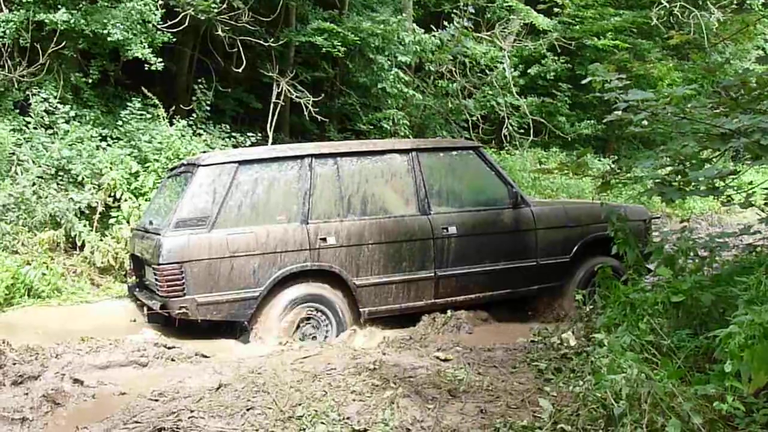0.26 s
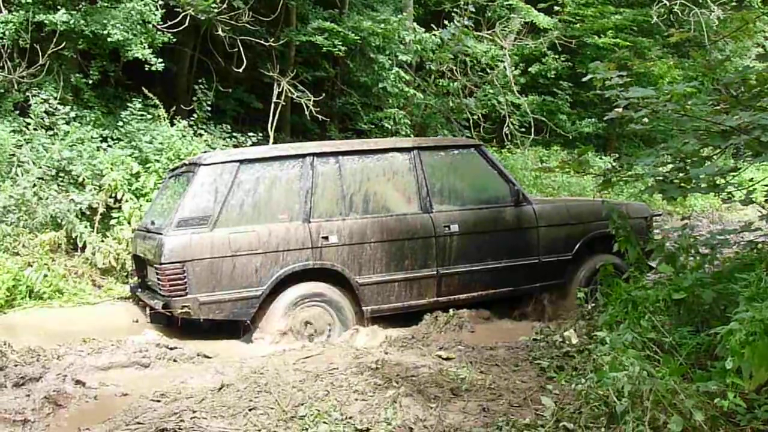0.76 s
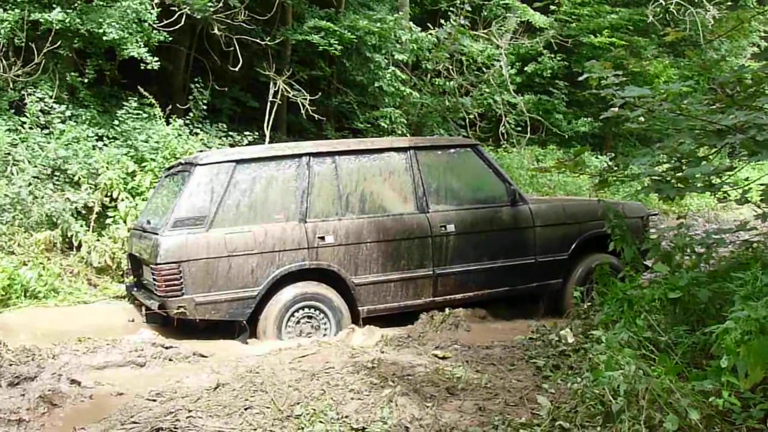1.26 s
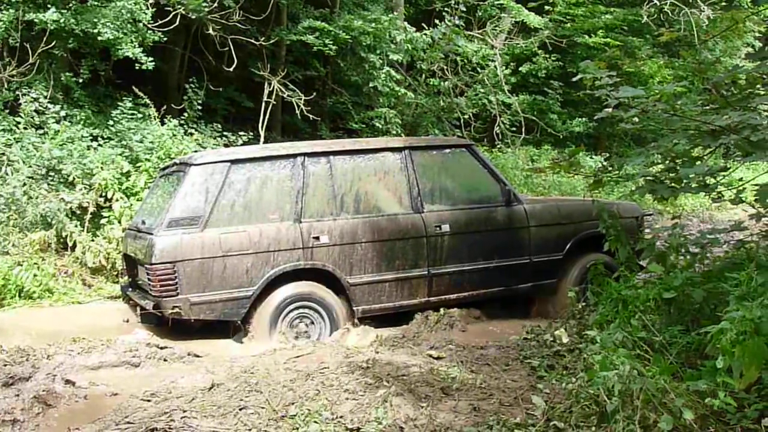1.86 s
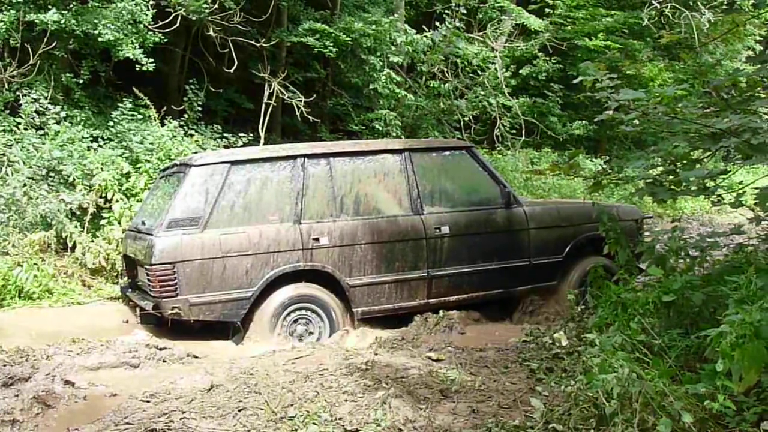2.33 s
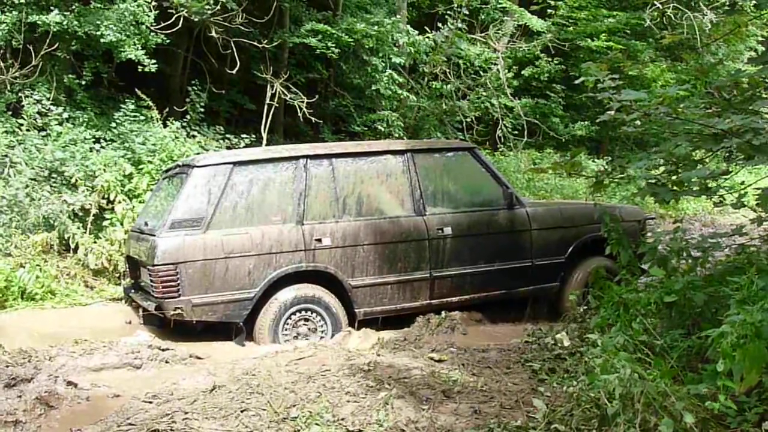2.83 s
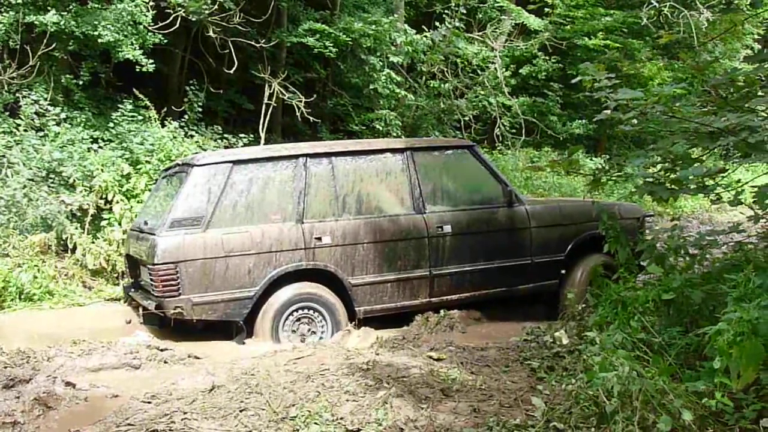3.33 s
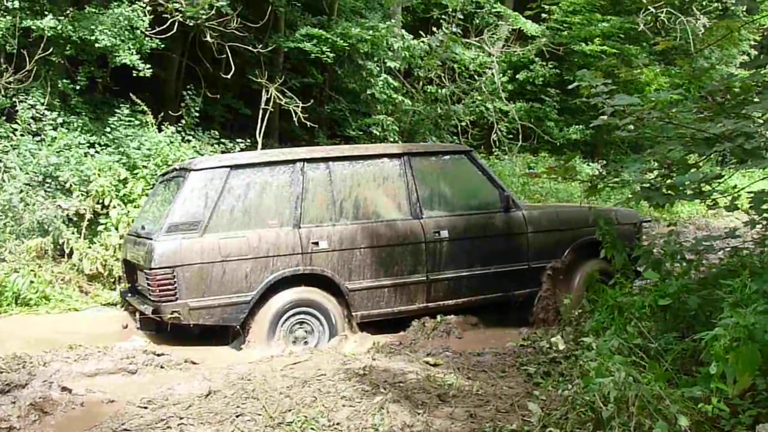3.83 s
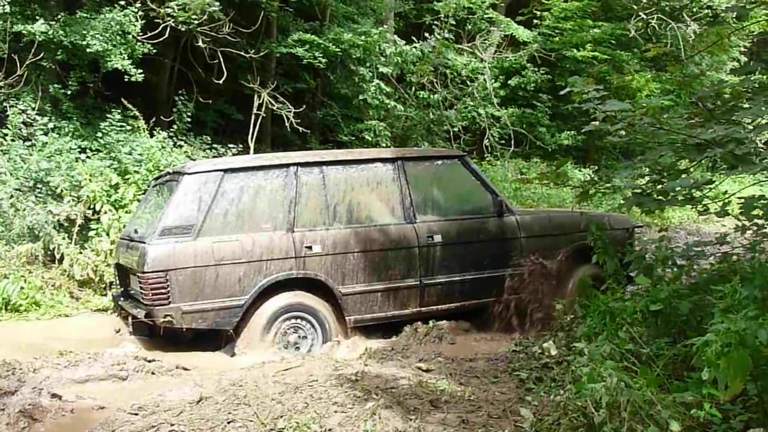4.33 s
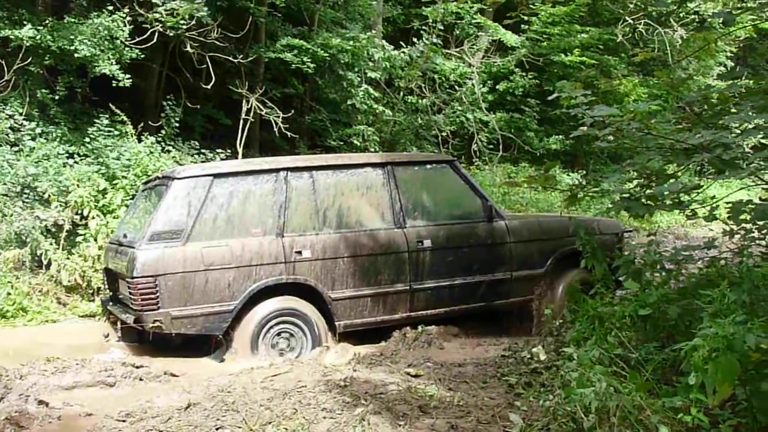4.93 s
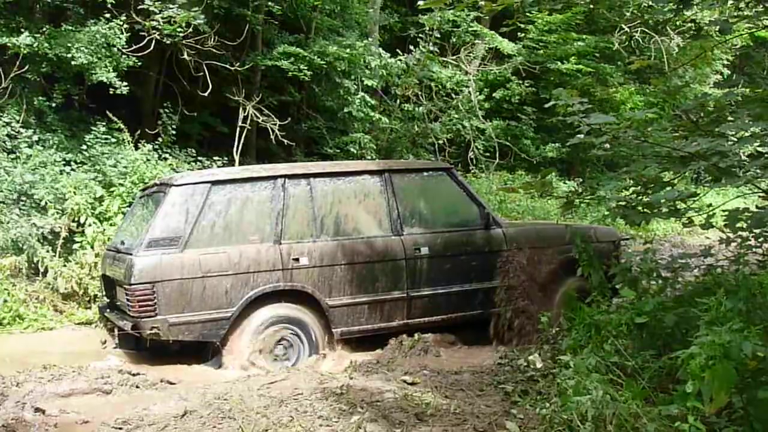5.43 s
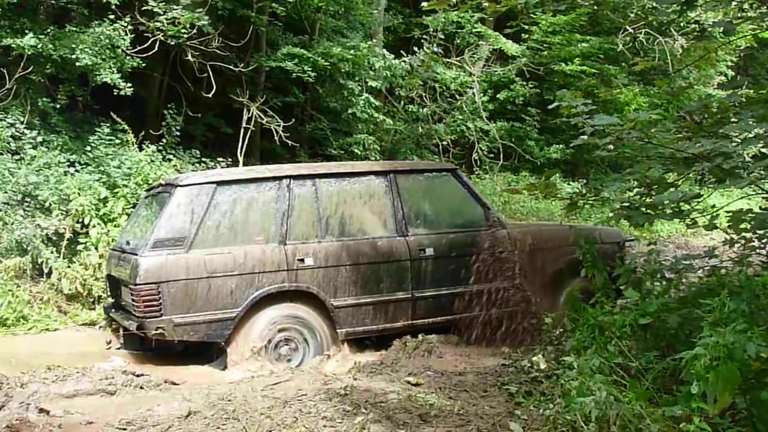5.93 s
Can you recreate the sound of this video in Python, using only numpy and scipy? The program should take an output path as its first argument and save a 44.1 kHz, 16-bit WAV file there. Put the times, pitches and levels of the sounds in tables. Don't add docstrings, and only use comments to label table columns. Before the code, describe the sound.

Throaty four-wheel-drive engine surges and drops several times, then climbs to a racing wheelspin, with mud spray, mechanical clatter and soft body thuds.

```python
import sys
import numpy as np
from scipy import signal
from scipy.fft import rfft, irfft, next_fast_len
from scipy.io import wavfile
from scipy.ndimage import uniform_filter1d, map_coordinates

SR = 44100
rng = np.random.default_rng(int(sys.argv[2]) if len(sys.argv) > 2 else 0)


def boost(x):
    u = np.asarray(x, float) / 20
    return 10 ** u


def master(y):
    cut = np.clip(np.atleast_2d(y).T, -1, 1)
    pcm = np.round(cut * 32767)
    wavfile.write(sys.argv[1], SR, pcm.astype(np.int16))


N = 272538
CYLINDERS = 8


def unit(x):
    return x / np.sqrt(np.mean(x ** 2) + 1e-20)


def along(points, hz):
    f, v = np.transpose(points)
    return np.interp(np.log(hz + 1), np.log(f + 1), v)


def curves(rows):
    s, *cols = np.transpose(rows)
    return [np.interp(np.arange(N) / SR, s, c) for c in cols]


def wobble(rate_hz):
    knots = rng.standard_normal(int(N * rate_hz / SR) + 4)
    return map_coordinates(knots, [np.arange(N) * rate_hz / SR], order=1)


def filtered(x, response):
    m = next_fast_len(N + SR // 2)
    return irfft(rfft(x, m) * response(np.fft.rfftfreq(m, 1 / SR)), m)[:N]


def noise(spectrum):
    return unit(filtered(rng.standard_normal(N), lambda hz: boost(along(spectrum, hz))))


def patchy(x, depth_db):
    z = signal.stft(x, nperseg=512)[2]
    field = uniform_filter1d(rng.standard_normal(z.shape), size=4, axis=0)
    field = uniform_filter1d(field, size=10, axis=1)
    return unit(signal.istft(z * boost(depth_db * unit(field)), nperseg=512)[1][:N])


def tone(turns, db, drift_db, drift_rad):
    phase = 2 * np.pi * (turns + rng.random()) + drift_rad * wobble(9)
    return np.sqrt(2) * boost(db + drift_db * wobble(12)) * np.sin(phase)


# f/Hz, density/(dB per Hz)
HISS = [(2500, -28.5), (4000, -1), (5000, -2), (7000, -2), (8000, -6.5), (8800, -27.5), (9500, -120)]


def microphone():
    whine = boost(-91) * np.sin(2 * np.pi * 6667 * np.arange(N) / SR)
    offset = -.003
    return boost(-70.5) * noise(HISS) + whine + offset


# f/Hz, density/(dB per Hz)
RUMBLE = [(10, -7.5), (25, -0.5), (60, 0.5), (120, -120)]


def air():
    return boost(-69 + 4 * wobble(5.5)) * noise(RUMBLE)


# t/s, beat f/Hz, level/dB
IDLING = [(0, 27, -40.5), (.6, 26.89, -45), (1.2, 26.92, -40.5), (2, 27.21, -45), (2.6, 27.1, -40),
          (3.2, 27.15, -36.5), (3.8, 27.04, -46), (4.5, 27, -39.5), (5.1, 27, -44.5), (5.6, 27.02, -46.5),
          (6.18, 27.14, -47)]
# multiple of the beat, level/dB
IDLE_TONES = [(6, 0.5), (8, -7), (9, -6), (10, -5.5), (11, -9.5), (12, -1), (13, 1), (14, -6.5),
              (15, -15.5), (16, -10), (19, -15), (22, -20)]
# f/Hz, density/(dB per Hz)
PURR = [(90, -120), (150, -5.5), (270, -2), (360, 0.5), (390, -13.5), (520, -17.5), (900, -120)]


def idler():
    beat_hz, level_db = curves(IDLING)
    turns = np.cumsum(beat_hz) / SR
    tones = sum(tone(round(multiple) * turns, db + level_db, drift_db=2.5, drift_rad=0.19)
                for multiple, db in IDLE_TONES)
    return tones + boost(level_db - 2.5) * noise(PURR)


# t/s, f/Hz, level/dB, t60/s
LURCHES = [
    (.56, 80, -42, .2),
    (2.261, 55, -37, .16),
    (2.66, 52, -47, .2),
    (4.27, 70.13, -41, 0.23),
    (4.4, 75, -34, .2),
]


def lurch():
    t = np.arange(N) / SR
    thuds = np.zeros(N)
    for start_s, hz, db, t60_s in LURCHES:
        age_s = np.maximum(t - start_s, 0)
        swell = 1 - np.exp(-age_s / .012)
        thuds += boost(db - 60 * age_s / t60_s) * swell * np.sin(2 * np.pi * hz * age_s)
    return thuds


# f/Hz, density/(dB per Hz)
SPATTER = [(2600, -120), (3100, -6.5), (3280, -4), (3400, -0.5), (3520, -6), (3750, -8.5), (3950, -11),
           (4150, -14.5), (4600, -15), (6000, -120)]
SPRAY_DB, USUAL_EFFORT_DB, SPRAY_DB_PER_EFFORT_DB = -64, -40, 0.97
SPRAY_FREE_DB = -6.5
SPRAY_DB_PER_HZ, SLOG_HZ = 0.0257, 130


def spray(firing_hz, effort_db, free):
    spray_db = SPRAY_DB + SPRAY_DB_PER_EFFORT_DB * (effort_db - USUAL_EFFORT_DB) + SPRAY_FREE_DB * free
    spray_db += SPRAY_DB_PER_HZ * (firing_hz - SLOG_HZ)
    flutter_db = 0.79 * wobble(30) + 0.85 * wobble(7)
    return boost(spray_db - 2.5 + flutter_db) * patchy(noise(SPATTER), depth_db=1.7)


# t/s, f/Hz, level/dB
GEARS = [
    (.6, 730, -80),
    (.69, 716, -41),
    (.8, 691.7, -45),
    (.88, 667.4, -82),
    (.97, 664, -77),
    (1.02, 673.4, -46),
    (1.09, 728, -41.5),
    (1.16, 759, -49),
    (1.22, 770, -92),
]


def gears():
    gear_hz, gear_db = curves(GEARS)
    return tone(np.cumsum(gear_hz) / SR, gear_db - 2.5, drift_db=3, drift_rad=.8)


def ticks(cycle, count, scatter_db):
    angle, size = rng.random(count), rng.standard_normal(count)
    when = np.arange(int(cycle[-1]))[:, None] + angle
    at = np.interp(when, cycle, np.arange(N)).ravel()
    blow = (size * boost(rng.normal(0, scatter_db, when.shape))).ravel()
    first, part = at.astype(int), at % 1
    early = np.bincount(first, blow * (1 - part), N + 1)
    late = np.bincount(first + 1, blow * part, N + 1)
    return (early + late)[:N]


# f/Hz, width/Hz, level/dB
BLOCK = [(430, 13, -2), (524, 50, -3), (703, 90, 0.5), (815, 73, -2), (887, 25, 0), (1070, 87, -7.5),
         (1306, 90, -1.5), (1462, 100, 2), (1646, 86, -2), (1804, 68, -8), (2040, 110, -13.5),
         (2316, 70, -13), (2730, 250, -15), (3320, 90, -29)]


def block_ring(x):
    def response(f):
        modes = sum((-1) ** k * boost(db) * 1j * f * width / (c * c - f * f + 1j * f * width)
                    for k, (c, width, db) in enumerate(BLOCK))
        return modes / (1 + (f / 2900) ** 8)
    return unit(filtered(x, response))


# f/Hz, density/(dB per Hz)
RUSH = [(300, -120), (450, -12), (560, -9), (700, -11), (900, -6.5), (1150, -10), (1470, -10.5),
        (1900, -14), (2400, -17.5), (2950, -25.5), (3100, -34), (3450, -41), (4000, -58.5), (6000, -120)]


def clatter(cycle, clatter_db):
    firing = CYLINDERS * cycle
    size_db = rng.normal(0, 1.0, CYLINDERS)[firing.astype(int) % CYLINDERS]
    bursts = boost(size_db - 13 * (firing % 1)) * rng.standard_normal(N)
    blows = boost(-2.5) * block_ring(ticks(cycle, count=96, scatter_db=1.5)) + boost(-9) * block_ring(bursts)
    rush = boost(0.69 * wobble(14) - 1.5) * patchy(noise(RUSH), depth_db=1.0)
    return boost(clatter_db) * (blows + rush)


# tone f/Hz, level/dB
FIRING = [(60, -41.5), (100, -25), (126, -25), (134, -32), (141, -26.5), (150, -30), (161, -17), (197, -20)]
FIFTH = [(125, -48), (145, -37), (160, -26), (175, -23), (184, -22), (192, -29.5), (199, -39.5),
         (220, -50.5)]
OCTAVE = [(135, -33.5), (172, -23), (200, -44), (262, -53.5), (279, -38.5), (312, -33.5), (340, -40.5),
          (390, -45.5)]
SHUT_DB = [-12.5, -15.5, -7]
BRAKING_DB_PER_HZ, BRAKING_HZ = -0.1413, 102


def strong_tones(firing_hz, cycle, opening, ragged):
    braking_db = BRAKING_DB_PER_HZ * np.maximum(firing_hz - BRAKING_HZ, 0)
    boom = np.zeros(N)
    for multiple, voice, loss_db in zip((8, 10, 16), (FIRING, FIFTH, OCTAVE), SHUT_DB):
        db = along(voice, multiple * firing_hz / CYLINDERS) + (loss_db + braking_db) * (1 - opening)
        boom += tone(multiple * cycle, db, drift_db=.4 + 2.2 * ragged, drift_rad=.04 + .3 * ragged)
    return boom


# multiple of the two-turn cycle, then level/dB at each firing rate below
UNEVEN = [(3, -15, 6, 1.5, 6.5), (4, -3.5, 1.5, -5, -5), (5, 11.5, 11.5, 3.5, -3), (6, 2.5, 2.5, 0.5, 6),
          (7, 8, 5.5, 1.5, -6), (9, -3, -4, -1, 3.5), (11, 6.5, 8.5, 8.5, 3), (12, 0, 11.5, 0.5, -3.5),
          (13, 5.5, 0, 3, -2.5), (14, -3.5, 9, 1.5, 8), (15, 4.5, 2.5, -10, -7.5), (17, -6.5, 5, 0.5, -2),
          (18, 9.5, 10, 2.5, -4), (19, 2.5, 0.5, -2, 7.5), (20, -12.5, -2, -4, 9), (21, -18, -4, 3, 6.5),
          (22, -13.5, -7, -5.5, 11), (23, -12, 3.5, -3.5, -7.5), (24, 10, 3, 7.5, 13.5),
          (25, 2.5, -1.5, -5.5, 1.5), (26, -5, 9, 12, 1.0), (27, -9, -1.5, -1.5, 8.5),
          (28, -3.5, -3, 1.5, 1), (29, 1.5, 4.5, 10, 3)]
RATES_HZ = [95, 120, 140, 180]
# f/Hz, level/dB
PIPE = [(45, -72.5), (80, -54.5), (120, -49.5), (150, -52), (172, -39.5), (195, -44), (220, -49.5),
        (265, -45), (300, -47.5), (330, -52.5), (445, -54.5), (480, -61.5), (700, -55.5), (1000, -57)]
UPPER = range(30, 45)
UPPER_DB, UPPER_SLOPE_DB, FIRING_BOOST_DB, FREE_UPPER_DB = -3.5, -0.2336, 8, 4.5
COAST_TILT_DB_PER_OCTAVE, TILT_MULTIPLE = -4, 8


def exhaust(firing_hz, cycle, opening, free, throttle_db):
    ragged = (1 - opening) * (firing_hz < 140)
    boom = strong_tones(firing_hz, cycle, opening, ragged)
    patterns = [(round(multiple), np.interp(firing_hz, RATES_HZ, db)) for multiple, *db in UNEVEN]
    for k in UPPER:
        upper_db = UPPER_DB + FREE_UPPER_DB * free + UPPER_SLOPE_DB * (k - UPPER[0])
        patterns.append((k, upper_db + FIRING_BOOST_DB * (k % CYLINDERS == 0)))
    for multiple, pattern_db in patterns:
        pipe_db = along(PIPE, multiple * firing_hz / CYLINDERS)
        octaves = np.clip(np.log2(multiple / TILT_MULTIPLE), -1, 1)
        pipe_db += COAST_TILT_DB_PER_OCTAVE * (1 - opening) * octaves
        boom += tone(multiple * cycle, pattern_db + pipe_db + throttle_db,
                     drift_db=1 + 2.5 * ragged, drift_rad=.1 + .5 * ragged)
    gas = noise([(15, -89.5)] + list(PIPE) + [(1500, -120)])
    return boom + boost(throttle_db - 43.5) * gas


# opens t/s, shuts t/s, press takes t/s
PEDAL = [
    (-.5, 0.51, .2),
    (.93, 2.245, 0.27),
    (2.6, 4.235, 0.23),
    (4.41, 7, 0.12),
]


def pedal():
    t, shut_s = np.arange(N) / SR, 0.069
    return sum(np.clip((t - on) / press, 0, 1) * np.clip(1 - (t - off) / shut_s, 0, 1)
               for on, off, press in PEDAL)


# t/s, firing f/Hz, effort level/dB
REVS = [(0, 151.9, -40.5), (.42, 176, -39), (.52, 169.8, -46.5), (.6, 137.7, -43.5), (.92, 67.52, -43.5),
        (1.22, 105, -39), (1.46, 128.2, -39.5), (1.85, 138.1, -39.5), (2.22, 142.2, -41), (2.6, 53.42, -41),
        (3.1, 105.2, -38.5), (3.4, 121.9, -38), (3.82, 140, -41), (4.21, 142.7, -41.5), (4.41, 91.15, -41),
        (4.7, 122.2, -38), (4.92, 132.5, -40.5), (6.18, 199, -39)]
OPEN_DB, COAST_DB = 2, -7
FREE_HZ, FREE_WIDTH_HZ, FREE_DB, FREE_CLATTER_DB = 171, 5.6, -4, -2.5
STRAIN_HZ, STRAIN_WIDTH_HZ, STRAIN_DB = 152, 8.1, 2.5
LUG_HZ, LUG_DB_PER_HZ = 94, .12
CLATTER_SHUT_DB = -1.5


def scene():
    firing_hz, effort_db = curves(REVS)
    cycle, opening = np.cumsum(firing_hz) / SR / CYLINDERS, pedal()
    free = np.clip((firing_hz - FREE_HZ) / FREE_WIDTH_HZ + .5, 0, 1) * opening
    strain = np.exp(-((firing_hz - STRAIN_HZ) / STRAIN_WIDTH_HZ) ** 2) * opening
    throttle_db = COAST_DB + (OPEN_DB - COAST_DB) * opening + STRAIN_DB * strain + FREE_DB * free
    throttle_db += LUG_DB_PER_HZ * np.minimum(firing_hz - LUG_HZ, 0)
    effort_db = effort_db + FREE_CLATTER_DB * free + STRAIN_DB * strain + CLATTER_SHUT_DB * (1 - opening)
    background = air() + idler() + lurch()
    wheels = spray(firing_hz, effort_db, free) + gears()
    engine = clatter(cycle, effort_db) + exhaust(firing_hz, cycle, opening, free, throttle_db)
    return (background + wheels + engine)[None]


def roll_off(x):
    return signal.sosfilt(signal.butter(12, 8800, fs=SR, output="sos"), x)


def record(dry):
    fade_in = np.clip(np.arange(N) / SR / .002 + .3, 0, 1)
    return roll_off(fade_in * dry + microphone())


dry = scene()
out = record(dry)
master(out)
```